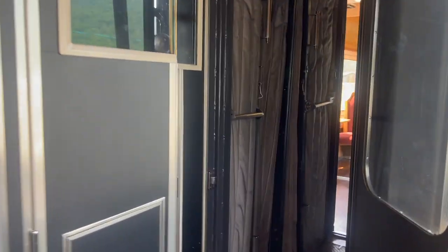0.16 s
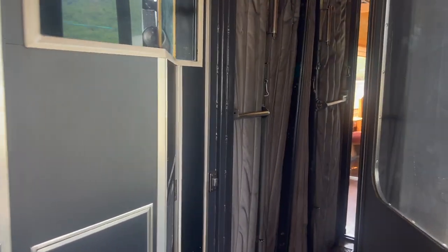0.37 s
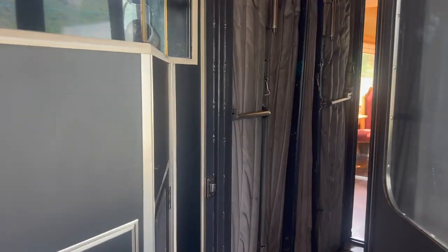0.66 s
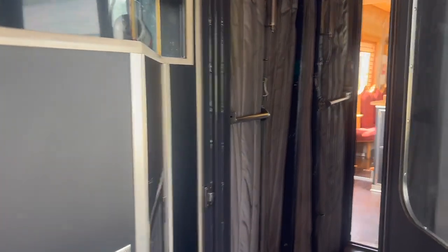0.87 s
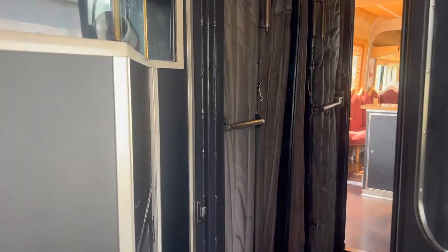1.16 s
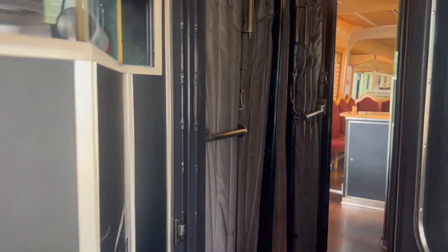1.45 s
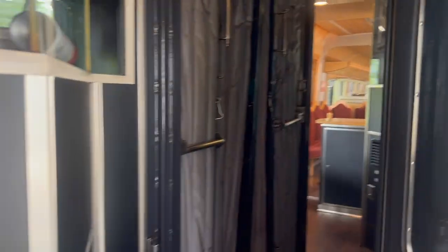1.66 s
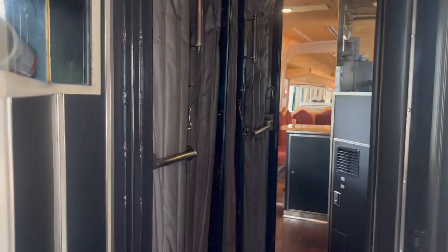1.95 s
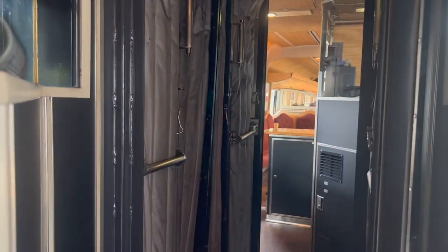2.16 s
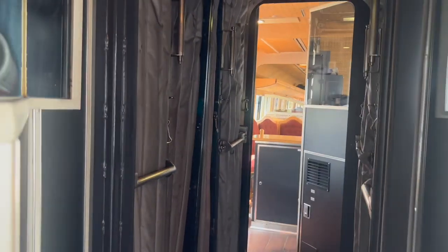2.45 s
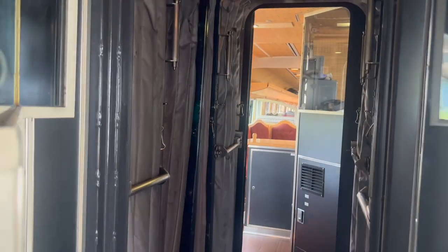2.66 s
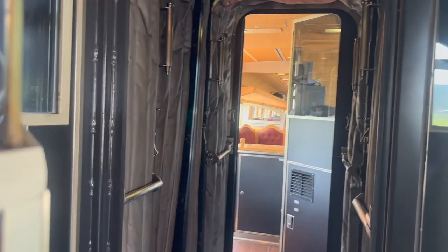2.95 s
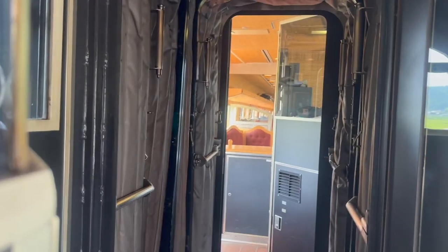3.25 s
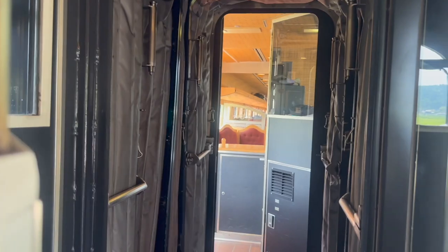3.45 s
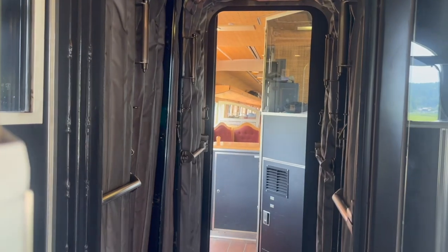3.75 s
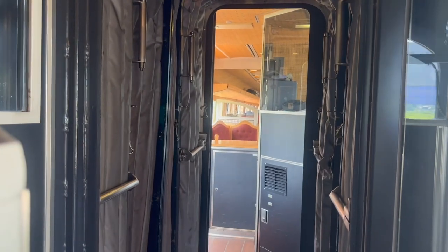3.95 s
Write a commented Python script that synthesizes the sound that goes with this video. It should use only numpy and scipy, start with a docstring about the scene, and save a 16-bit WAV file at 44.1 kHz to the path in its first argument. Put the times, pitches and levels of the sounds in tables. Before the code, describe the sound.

Deep rumbling train ride heard between carriages: droning engines, rolling roar, faint sizzle and rattle, and heavy clunks about every second.

```python
"""Wheels roar on the rail and drum the floor and panels in the end vestibule of a diesel railcar gathering speed.
Noise shaped by body resonances makes the roar, boom, rail sizzle and bellows hiss; noise-driven modes ring the
panels, wheel discs and loose fittings. Two underfloor engines, as rising sine orders a little out of step, throb
together. Axle pairs cross rail joints about once a second in noise bursts, and hard single blows ring the frame."""
import sys
import numpy as np
from scipy import signal
from scipy.fft import rfft, irfft
from scipy.io import wavfile
from scipy.ndimage import uniform_filter1d

SR = 44100
rng = np.random.default_rng(int(sys.argv[2]) if len(sys.argv) > 2 else 0)


def wrap_up_sound(samples):
    """Save the sound to the file named by the first command line argument, as 16-bit audio."""
    columns = np.atleast_2d(samples).T
    # keep every value between -1 and 1, then stretch to whole-number steps
    tamed = np.clip(columns, -1, 1)
    steps = np.round(tamed * 32767).astype(np.int16)
    wavfile.write(sys.argv[1], SR, steps)


N = 180799
LONG = N + SR // 10  # samples; the layers run on a little past the end


def undb(db):
    """Decibels to an amplitude factor."""
    return 10 ** (np.asarray(db) / 20)


def curve(table):
    """Columns of a (start_s, ...) table, joined by straight lines, at every sample."""
    start_s, *columns = np.transpose(table)
    t = np.arange(LONG) / SR
    return [np.interp(t, start_s, column) for column in columns]


def shape(hz, points):
    """Values of (hz, value) points, joined on a log-frequency axis."""
    point_hz, value = np.transpose(points)
    return np.interp(np.log(hz + 1), np.log(point_hz), value)


def walk(rate):
    """Random levels held 1 / rate s and slewed twice; spread near 1."""
    hold = int(SR / rate)
    steps = np.repeat(rng.standard_normal(LONG // hold + 1), hold)
    return 1.4 * uniform_filter1d(uniform_filter1d(steps, hold), hold)[:LONG]


# Stereo spread of each band: hz, side_minus_mid_db
STEREO_WIDTH = [(30, -23), (60, -23), (125, -17.5), (250, -17), (500, -5), (1000, -5), (2000, -1.5),
                (3500, -7), (6000, -3), (8500, -4.5), (11000, 0.5), (15000, 0)]


def colour(points, ring=1.):
    """Causal response of a spectrum lifted by the body resonances, white noise in gives mid rms 1; mid and side."""
    size = 16384
    hz = np.arange(size // 2 + 1) * SR / size
    lift_db = sum(lift / (1 + (2 * (hz - mode_hz) / width_hz) ** 2) for mode_hz, width_hz, lift in BODY_MODES)
    mid_db = shape(hz, points) + ring * lift_db
    responses = []
    for gain_db in (mid_db, mid_db + shape(hz, STEREO_WIDTH)):
        # folding the cepstrum onto positive time gives minimum phase
        cepstrum = irfft(np.log(undb(gain_db)))
        cepstrum[1:size // 2] *= 2
        cepstrum[size // 2 + 1:] = 0
        responses.append(irfft(np.exp(rfft(cepstrum)))[:size // 2])
    return np.array(responses) / np.sqrt(np.sum(responses[0] ** 2))


def play(envelope, response, late=0):
    """Unrelated mid and side noise under an envelope, rung through a response that peaks late samples in."""
    lead = response.shape[1]
    noise = rng.standard_normal((2, LONG + lead + late))
    drive = np.pad(envelope, (lead, late), "edge") * noise
    return signal.fftconvolve(drive, response, axes=1)[:, lead + late:lead + late + LONG]


def sing(db, hz, width_hz, wander_hz, side_db):
    """A mode driven by noise, its pitch wandering; it builds up before it dies."""
    age = np.arange(SR // 8) / SR
    swell = age * np.exp(-np.pi * width_hz * age)
    mode = np.array([swell, undb(side_db) * swell]) / np.sqrt(np.sum(swell ** 2))
    turn = 2 * np.pi * np.cumsum(hz + wander_hz * walk(6)) / SR
    return play(undb(db), mode) * np.cos(turn) + play(undb(db), mode) * np.sin(turn)


# The ride's moving levels and balance, before flicker and trims:
# start_s, rolling_roar_db, wheel_ring_db, rail_sizzle_db, bellows_hiss_db, left_minus_right_db
RIDE_LEVELS = [(0.0, -18.5, -42, -42.5, -58, 1), (0.2, -20, -36.5, -42.5, -57, 0.5),
               (0.42, -21, -44, -42.5, -60, 0.5), (0.7, -22, -41, -45.5, -57.5, 0.5),
               (0.9, -22, -39, -45.5, -61, 1.5), (1.15, -21.5, -45, -45.5, -62, 1.5),
               (1.3, -22, -41.5, -45, -61, 0.5), (1.55, -23, -37, -44, -58, 1),
               (1.72, -19, -42, -43.5, -59.5, 1), (1.93, -18.5, -37, -43.5, -56, 1),
               (2.3, -19.5, -38, -43.5, -58, 1.5), (2.7, -20.5, -39.5, -43.5, -56, 1.5),
               (3.0, -19, -37, -44, -57, 1), (3.3, -20, -40.5, -44.5, -58.5, 1),
               (3.65, -21.5, -38, -44.5, -58.5, 1), (4.1, -19, -38, -46.5, -58, 1.5)]
# Spectrum of the rolling roar: hz, relative_db_per_hz
ROAR_SPECTRUM = [(30, -56), (60, -4.5), (80, -0.5), (100, -2), (125, 1), (170, -3.5), (260, -10), (400, -8),
                 (800, -11.5), (1100, -14.5), (1450, -23), (1900, -28.5), (2600, -37.5), (4000, -52.5),
                 (7000, -72), (16000, -110)]


def roar(rough):
    """Panels of each size take up the wheel roughness in turn: every octave of the roar wanders alone."""
    roar_db = curve(RIDE_LEVELS)[0]
    size, late = 2 ** 15, 2 ** 12
    spectrum = rfft(colour(ROAR_SPECTRUM, ring=0.56), size)  # just over half the body lift
    octave = np.log2(np.fft.rfftfreq(size, 1 / SR) + 1)
    out = 0
    for centre in range(4, 15):
        share = np.cos(np.pi / 2 * np.clip(octave - centre, -1, 1))  # neighbours add to full power
        band = np.roll(irfft(spectrum * share), late, axis=1)[:, :2 ** 14]
        level_db = roar_db + 0.12 * rough + 1.0 * walk(7.91) + 0.66 * walk(60)
        out = out + play(undb(level_db), band, late=late)
    return out


# Spectrum of the car-body boom: hz, relative_db_per_hz
BOOM_SPECTRUM = [(15, -22), (25, 4), (34, -7), (48, 20.5), (65, 12.5), (90, 2), (140, -19), (400, -71),
                 (4000, -120)]
# Moments when the car body booms up: centre_s, lift_db
BOOM_SURGES = [(0.05, 1), (0.78, 4), (1.21, 10), (2.18, 3), (2.32, 7), (3.21, 6), (3.38, 12), (3.67, 3)]
BOOM_DB, BOOM_FADE_DB_PER_S, BOOM_WAVER_DB = -28.5, -0.9, -1
SURGE_S = 0.047  # time from a surge's centre to 1/e of its lift


def boom():
    """The car body booms as low noise that fades slowly, wavers and swells in brief surges."""
    t = np.arange(LONG) / SR
    surge_db = sum(lift_db * np.exp(-((t - centre_s) / SURGE_S) ** 2) for centre_s, lift_db in BOOM_SURGES)
    level_db = BOOM_DB + BOOM_FADE_DB_PER_S * t + BOOM_WAVER_DB * walk(9.4) + surge_db
    return play(undb(level_db), colour(BOOM_SPECTRUM, ring=0))


# Spectrum of rail sizzle and of joint rattle: hz, relative_db_per_hz
SIZZLE_SPECTRUM = [(500, -59), (1800, 1), (2400, 0.5), (3200, -4), (4500, -9), (6000, -19.5), (9000, -19.5),
                   (16000, -99)]


def sizzle(rough):
    """Rough wheels sizzle on the rail as bright noise, partly flickering with the roar."""
    sizzle_db = curve(RIDE_LEVELS)[2]
    level_db = sizzle_db + 0.56 * rough + 0.44 * walk(7.4)
    return play(undb(level_db), colour(SIZZLE_SPECTRUM, ring=1.5))


# Spectrum of air at the bellows, steady and in puffs: hz, relative_db_per_hz
HISS_SPECTRUM = [(2000, -29), (5000, 5), (7000, 4), (9000, -4), (12000, -4), (14000, -7), (16000, -6)]


def hiss():
    """Air hisses at the bellows as high noise that flickers a little."""
    hiss_db = curve(RIDE_LEVELS)[3]
    return play(undb(hiss_db + 0.36 * walk(11)), colour(HISS_SPECTRUM, ring=0))


# Floor and panel resonances, lifting most spectra too: pitch_hz, width_hz, lift_db (before each sound's share)
BODY_MODES = [(209.8, 27, 5.5), (316.6, 36.2, 8.5), (430.6, 42, 5.5), (613, 25, 3), (688.6, 26.5, 5.5),
              (836, 61.5, 7)]
PANEL_DB = -20  # fitful ringing against the roar, before each mode's lift


def panels():
    """Floor and panels break into short fits of ringing, each at its own moments and a little off pitch each time."""
    roar_db = curve(RIDE_LEVELS)[0]
    out = 0
    for hz, width_hz, lift_db in BODY_MODES:
        fits_db = 0.78 * walk(12) + 2.68 * walk(32)
        out = out + sing(roar_db + PANEL_DB + lift_db + fits_db, hz, 1.52 * width_hz,
                         wander_hz=.012 * hz, side_db=shape(hz, STEREO_WIDTH))
    return out


# Wheel disc modes: pitch_hz, width_hz, relative_level_db
WHEEL_MODES = [(1606, 85, 0), (1685, 110, 0)]


def wheels():
    """The wheel discs sing in two close modes that the rail roughness drives unevenly, each on its own."""
    ring_db = curve(RIDE_LEVELS)[1] - 3  # two modes share the ring
    return sum(sing(ring_db + mode_db + 1.3 * walk(60), hz, width_hz, wander_hz=8, side_db=-5.0)
               for hz, width_hz, mode_db in WHEEL_MODES)


# Modes of the loose fittings: pitch_hz, width_hz, relative_level_db
FITTING_MODES = [(2008, 45, 0), (2260, 170, 0), (2420, 170, -2), (2890, 200, -3)]
# How hard the fittings buzz: start_s, lowest_mode_db, upper_modes_db
BUZZ_LEVELS = [(0, -64, -51), (.1, -46, -41), (.3, -48, -51.5), (.42, -50, -52), (.6, -44.5, -47),
               (.9, -51, -53.5), (1.3, -53, -52.5), (1.7, -50, -49.5), (2.0, -46, -60), (2.06, -38.5, -55),
               (2.14, -48, -47), (2.6, -50, -52), (3.0, -52, -49.5), (3.5, -47, -50.5), (4.1, -51, -50)]


def fittings():
    """Loose fittings buzz in fits, each mode on its own."""
    low_db, upper_db = curve(BUZZ_LEVELS)
    out = 0
    for k, (hz, width_hz, mode_db) in enumerate(FITTING_MODES):
        buzz_db = upper_db if k else low_db
        fits_db = 0.6 * walk(16) + 2.0 * walk(60)
        out = out + sing(buzz_db + mode_db + fits_db, hz, width_hz, wander_hz=13, side_db=-14)
    return out


# The two engines, slower first: base_rate_hz (at the start), gain_hz_per_s
ENGINE_RATES = [(41.38, .23), (42.24, .26)]
# Engine orders: multiple of base rate, slower_engine_db, faster_engine_db (before throb and waver),
# together_s (first moment the two swell together)
ENGINE_ORDERS = [(1, -43, -51, .3), (2, -28, -30, .2), (3, -26.5, -25.5, .284), (4, -41, -33, .284),
                 (5, -40, -49, .182), (6, -48, -49, .168)]
# The drone swells and sinks: start_s, orders_to_second_db, higher_orders_db
THROB_LEVELS = [(0, -4.5, -3), (.3, 3.5, -0.5), (.5, -10, -1.5), (.95, 0.5, -5), (1.3, 1, -2.5),
                (1.75, -1.5, -1.5), (2.0, -2, -4), (2.25, 4.5, -3), (2.5, -3.5, -1), (2.7, -1, -5),
                (2.9, -1, -4.5), (3.15, -5, 0), (3.4, -11, -1.5), (3.7, -16, -7), (3.95, -2, -2.5),
                (4.1, -8, -2.5)]
HUM_HZ, HUM_DB, HUM_FADE_DB_PER_S = 61.55, -29, -2.5


def engine_turns(s):
    """Phase of each engine in radians as its rate climbs steadily."""
    return [2 * np.pi * (hz * s + gain * s ** 2 / 2) for hz, gain in ENGINE_RATES]


def engines():
    """Two engines gain speed, their orders beating; a steady-pitched hum fades beside them, wavering on its own."""
    t = np.arange(LONG) / SR
    hum_db = HUM_DB + HUM_FADE_DB_PER_S * t + 3.0 * walk(6.7)
    drone = undb(hum_db) * np.sin(2 * np.pi * HUM_HZ * t + 0.36 * walk(4.04))
    low_db, high_db = curve(THROB_LEVELS)
    for order, slow_db, fast_db, together_s in ENGINE_ORDERS:
        throb_db = low_db if order < 3 else high_db
        start = 2 * np.pi * rng.random() + 0.38 * walk(11)
        for turn, turn0, db in zip(engine_turns(t), engine_turns(together_s), (slow_db, fast_db)):
            level_db = db + throb_db + 1.8 * walk(15)
            phase = order * (turn - turn0) + start + 0.13 * walk(10)
            drone = drone + undb(level_db) * np.sin(phase)
    return np.sqrt(2) * np.array([drone, undb(-19) * drone])  # sqrt(2): sine levels are rms


# Wheels over rail joints: start_s, floor_knock_db, panel_clack_db, frame_thud_db, rattle_db, puff_db,
# burst_s (before each layer's hold)
JOINT_HITS = [(0.033, -37, -20, -42, -38, -55, 0.027), (0.144, -51, -23.5, -38, -45, -63, 0.075),
              (0.861, -17, -22, -34, -52, -57, 0.037), (1.093, -24, -24.5, -43, -48, -56.5, 0.035),
              (1.749, -20.5, -27.5, -24, -69, -77, 0.032), (1.835, -33, -23.5, -39, -52, -69, 0.0071),
              (1.909, -18, -19, -20, -41, -56, 0.04), (2.143, -23.5, -20, -22, -43.5, -51.5, 0.028),
              (2.205, -28, -45, -47, -49, -59, 0.014), (2.878, -21, -27, -18, -51, -73, 0.023),
              (2.960, -21.5, -19, -22, -50, -56.5, 0.049), (3.185, -15, -24.5, -17.5, -45, -57, 0.05),
              (3.926, -20, -25, -27, -48, -61, 0.0094), (3.997, -19, -16, -27.5, -40.5, -56, 0.033)]


def blows(db, response, rise_s, hold, tail_s, tail_db, bounce_db, edge=3):
    """At every joint a quick rise, a burst while the wheel bounces and a shudder tail, rung through a response."""
    out = np.zeros((2, N + SR))
    age = np.arange(SR // 2) / SR
    for (start_s, *_, burst_s), level_db in zip(JOINT_HITS, db):
        span_s = max(hold * burst_s, .005)
        rise = 1 - np.exp(-age / rise_s)
        fall = np.exp(-(age / span_s) ** edge) + undb(tail_db) * np.exp(-age / tail_s)
        bounce = undb(bounce_db * walk(167)[:len(age)])  # contact comes and goes in knocks a few ms apart
        drive = rise * fall * bounce * rng.standard_normal((2, len(age)))
        blow = signal.fftconvolve(drive, response, axes=1)[:, :len(age)]
        # the level is the rms over the burst itself
        blow *= undb(level_db) / np.sqrt(np.mean(blow[0, :int(1.3 * span_s * SR)] ** 2))
        start = int(start_s * SR)
        out[:, start:start + len(age)] += blow
    return out[:, :LONG]


# Spectra of floor knock, panel clack and joint frame thud: hz, relative_db_per_hz
KNOCK_SPECTRUM = [(80, -50.5), (200, 0), (300, 6), (450, 1.5), (650, -4), (900, -7.5), (1500, -62.5),
                  (6000, -110)]
CLACK_SPECTRUM = [(200, -49.5), (500, -4), (700, 2.5), (900, -4), (1200, -16), (2000, -27), (4000, -51),
                  (9000, -100)]
THUD_SPECTRUM = [(30, -35), (80, -5), (120, 2.5), (200, 4), (280, -20.5), (700, -72), (4000, -110)]


def joints():
    """Each axle knocks the floor, clacks the panels, thuds the frame, rattles fittings and puffs the bellows."""
    _, knock_db, clack_db, thud_db, rattle_db, puff_db, _ = np.transpose(JOINT_HITS)
    knock = blows(knock_db, colour(KNOCK_SPECTRUM), rise_s=0.0068, hold=0.66,
                  tail_s=0.062, tail_db=-17.5, bounce_db=0.95)
    clack = blows(clack_db, colour(CLACK_SPECTRUM), rise_s=0.00037, hold=1.0,
                  tail_s=0.044, tail_db=-2, bounce_db=3.3)
    thud = blows(thud_db, colour(THUD_SPECTRUM, ring=0.22), rise_s=0.0096, hold=1.0,
                 tail_s=0.12, tail_db=-14.0, bounce_db=0)
    rattle = blows(rattle_db, colour(SIZZLE_SPECTRUM, ring=0.34), rise_s=0.014, hold=1.0,
                   tail_s=0.074, tail_db=1, bounce_db=1.7, edge=3.1)
    puff = blows(puff_db, colour(HISS_SPECTRUM, ring=0), rise_s=0.024, hold=2.7,
                 tail_s=0.13, tail_db=-7, bounce_db=0.4, edge=1.2)
    return knock + clack + thud + rattle + puff


# Firm blows of wheel on rail end and of the frame settling:
# start_s, floor_knock_db, panel_clack_db, frame_thud_db
HARD_BLOWS = [(0.045, -40, -21.5, -38), (0.864, -24, -37, -15), (0.871, -27, -26, -39),
              (0.886, -24, -25, -22), (1.096, -19.5, -29, -41), (1.407, -28, -29, -24),
              (1.453, -26, -34, -21), (1.506, -22, -36, -32), (1.918, -11, -22, -21),
              (1.929, -28, -17, -27), (1.942, -28, -31, -12), (2.157, -12, -26, -13),
              (2.385, -19, -45, -40), (2.888, -32, -29, -18.5), (2.916, -23, -27, -22.5),
              (2.968, -13, -23, -35), (2.973, -14.5, -29, -33), (2.989, -23, -37, -12),
              (3.038, -26, -36, -20), (3.195, -14, -32, -21), (3.200, -23, -35, -25),
              (3.217, -18, -33, -22), (3.246, -32, -28, -5), (3.939, -33, -21, -35),
              (3.959, -36, -32, -12.5), (4.000, -16, -23, -6.5), (4.013, -15.5, -19, -37),
              (4.018, -33, -15, -10.5)]
# Spectrum of a single frame blow: hz, relative_db_per_hz
THUMP_SPECTRUM = [(30, -31), (80, 3.5), (115, 8), (150, 3.5), (190, 5), (300, -18.5), (700, -25),
                  (4000, -110)]
STRIKE_S = 0.012  # span over which a blow has its level


def strikes():
    """Single hard blows, as impulses, set floor, panels and frame ringing."""
    out = 0
    layers = [(KNOCK_SPECTRUM, 1.2), (CLACK_SPECTRUM, 1.2), (THUMP_SPECTRUM, .4)]
    for column, (points, ring) in enumerate(layers, 1):
        response = colour(points, ring=ring) * np.sqrt(STRIKE_S * SR)
        drive = np.zeros((2, LONG))
        for row, side in zip(HARD_BLOWS, rng.standard_normal(len(HARD_BLOWS))):
            drive[:, int(row[0] * SR)] = -undb(row[column]) * np.array([1, side])  # chance side share
        out = out + signal.fftconvolve(drive, response, axes=1)[:, :LONG]
    return out


# Band balance of the two microphone ports: hz, left_minus_right_db
PORT_BALANCE = [(60, -1.5), (125, 0.5), (500, 1.4), (1000, 1), (2000, 1.5), (4000, 3.5), (8000, 1.5),
                (15000, -1)]
# Phase between the ports: hz, left_leads_right_rad
PORT_PHASE = [(60, 0), (500, 0.2), (1980, -.5), (2840, .8), (4200, .4), (6550, .3), (16000, 0)]


def ports(mid, side):
    """The two microphone ports favour different bands and hear them a little apart."""
    hz = np.fft.rfftfreq(len(mid), 1 / SR)
    port = undb(shape(hz, PORT_BALANCE) / 2) * np.exp(.5j * shape(hz, PORT_PHASE))
    left = irfft(rfft(mid + side) * port, len(mid))
    right = irfft(rfft(mid - side) / port, len(mid))
    return np.array([left, right])


def scene():
    """All layers sum as mid and side, pass the two ports and drift slightly between left and right."""
    rough = walk(8.89)  # wheel roughness shared by roar and sizzle
    ride = roar(rough) + boom() + sizzle(rough) + hiss()
    layers = ride + panels() + wheels() + fittings() + engines() + joints() + strikes()
    lead_in = SR // 10  # mirrored start keeps the port filter's edge out of the way
    mid, side = np.pad(layers, ((0, 0), (lead_in, 0)), "reflect", reflect_type="odd")
    stereo = ports(mid, side)[:, lead_in:lead_in + N]
    pan_db = curve(RIDE_LEVELS)[4][:N]
    pan_db = pan_db - pan_db.mean()  # only the drift is used
    return stereo * undb(np.array([pan_db, -pan_db]) / 2)


TOP_HZ = 15750  # edge of the top cut


def record(dry):
    """The phone rounds the loudest peaks and cuts the top."""
    rounded = dry / (1 + np.abs(dry / .97) ** 4) ** (1 / 4)
    top_cut = signal.ellip(12, .2, 80, TOP_HZ, fs=SR, output="sos")
    return signal.sosfilt(top_cut, rounded)


dry = scene()
out = record(dry)
wrap_up_sound(out)
```